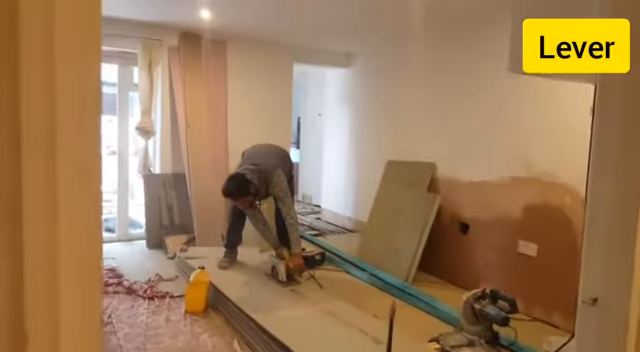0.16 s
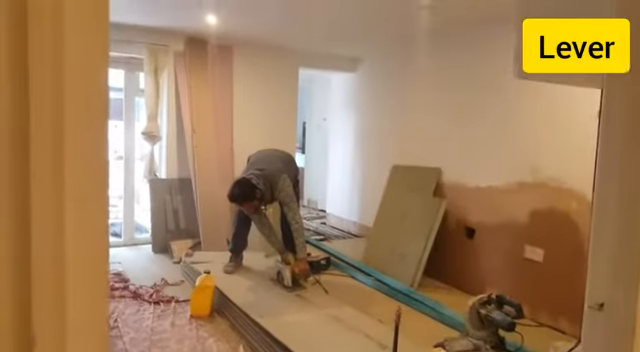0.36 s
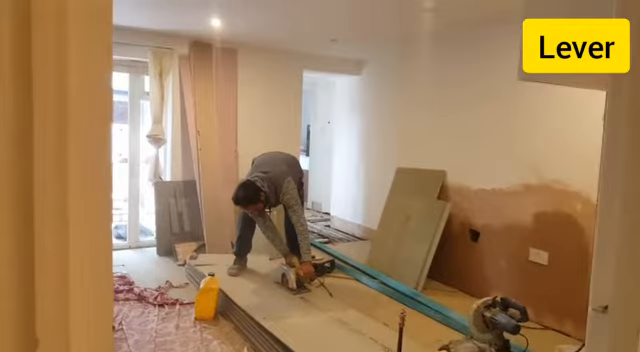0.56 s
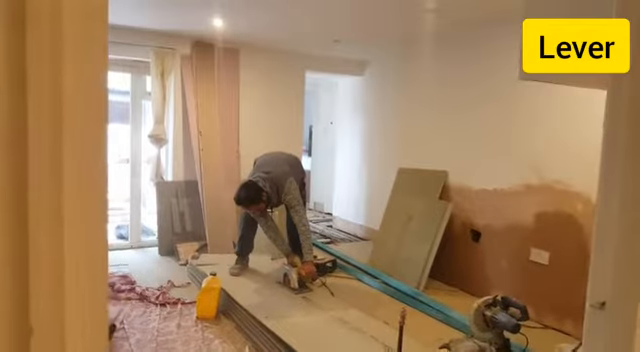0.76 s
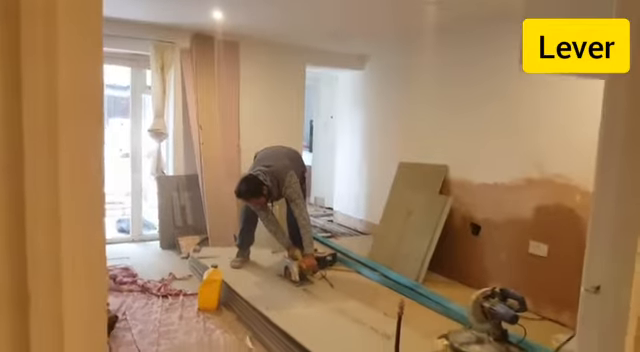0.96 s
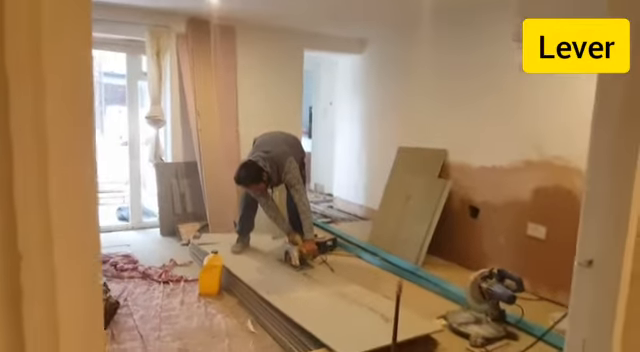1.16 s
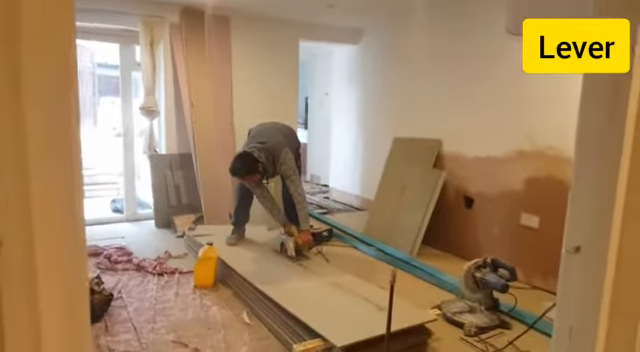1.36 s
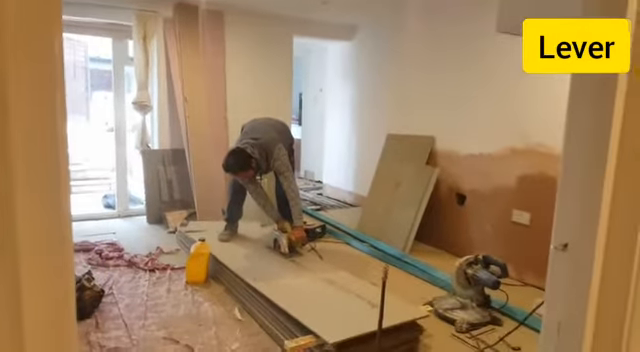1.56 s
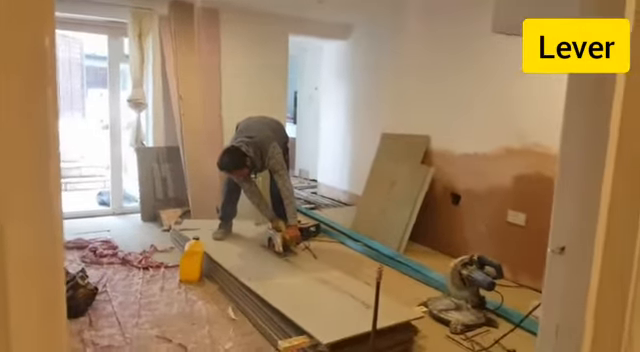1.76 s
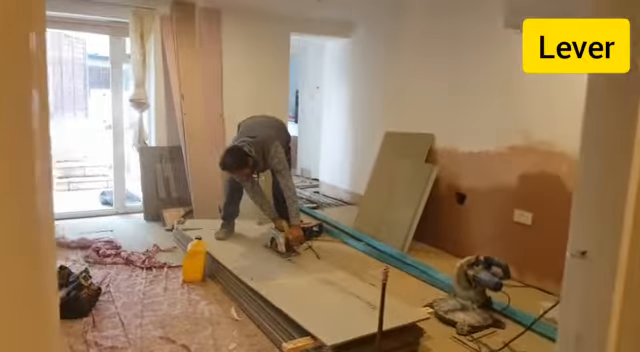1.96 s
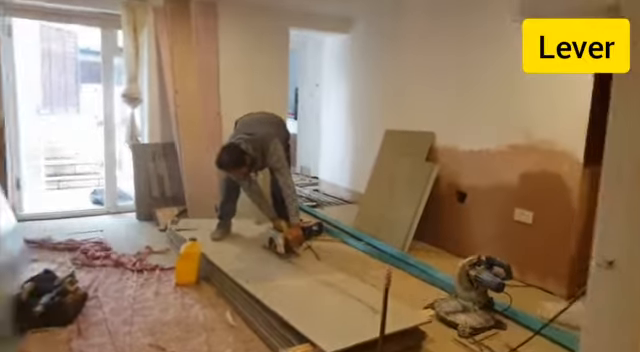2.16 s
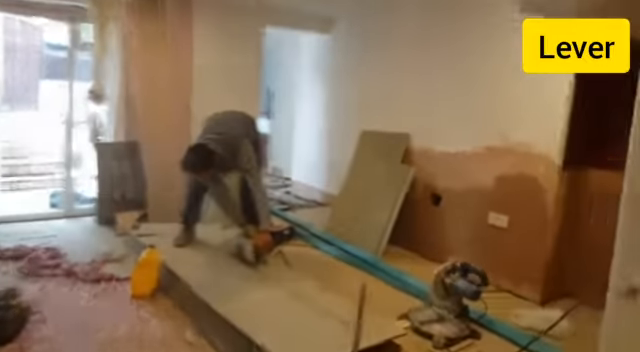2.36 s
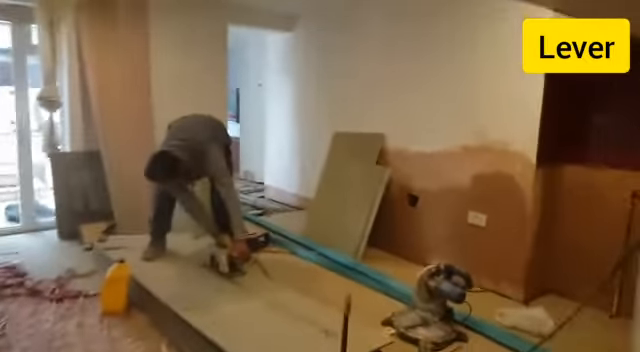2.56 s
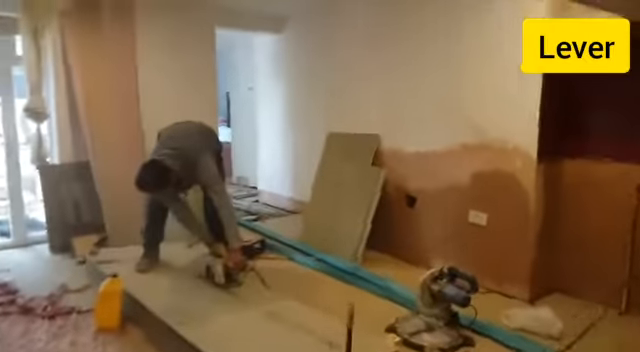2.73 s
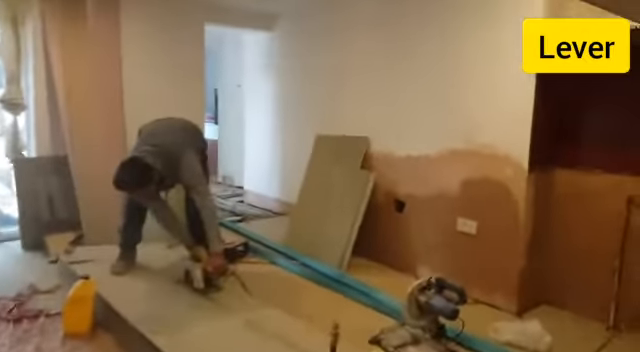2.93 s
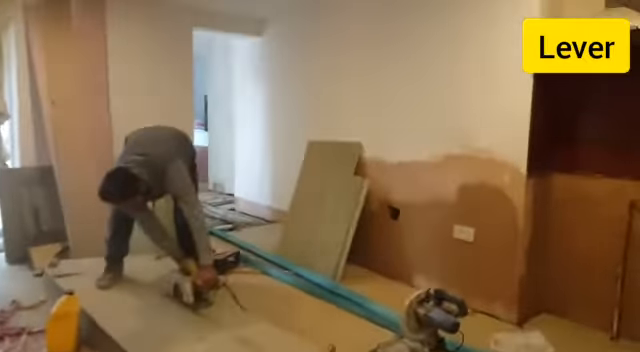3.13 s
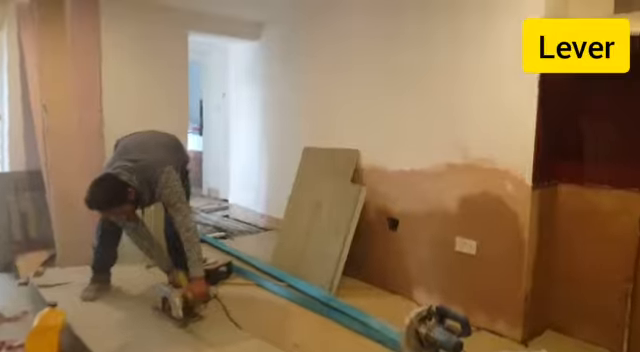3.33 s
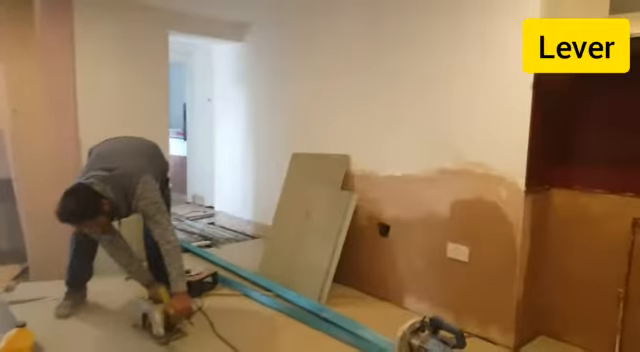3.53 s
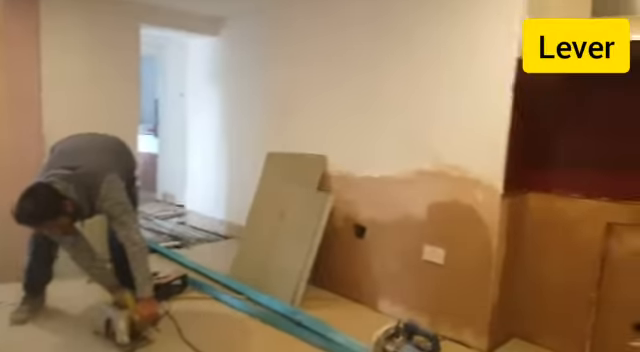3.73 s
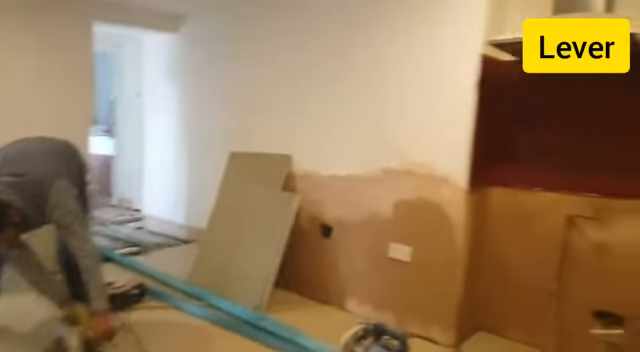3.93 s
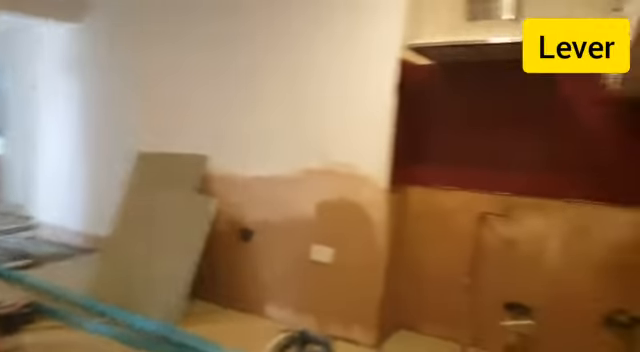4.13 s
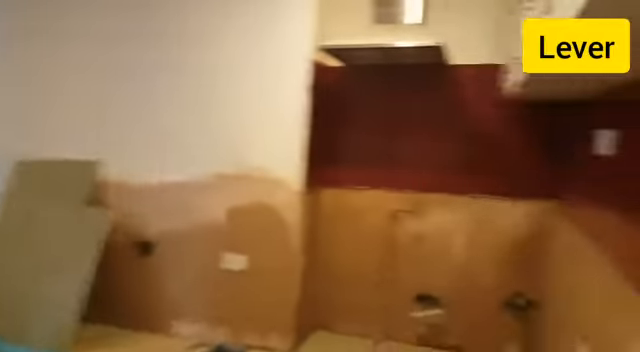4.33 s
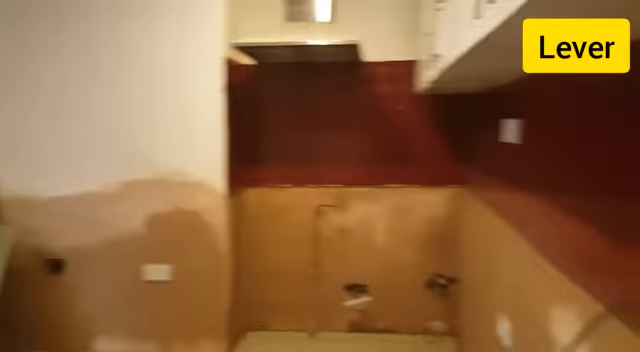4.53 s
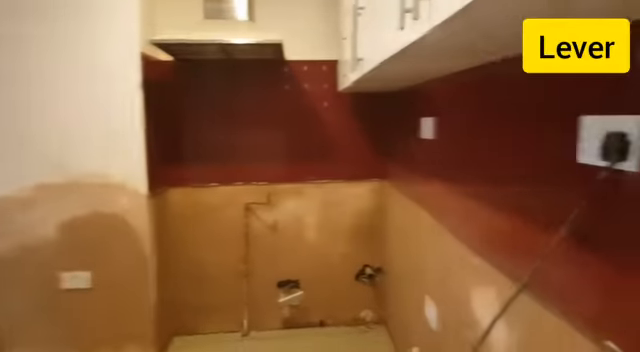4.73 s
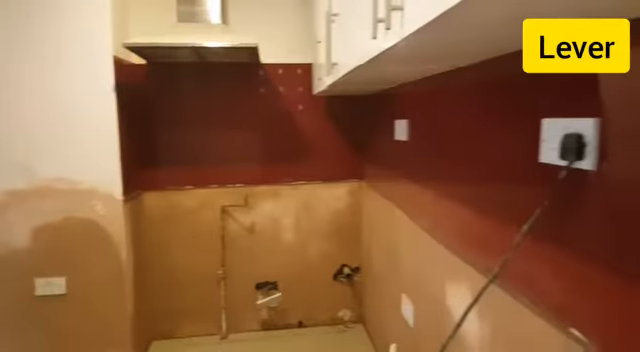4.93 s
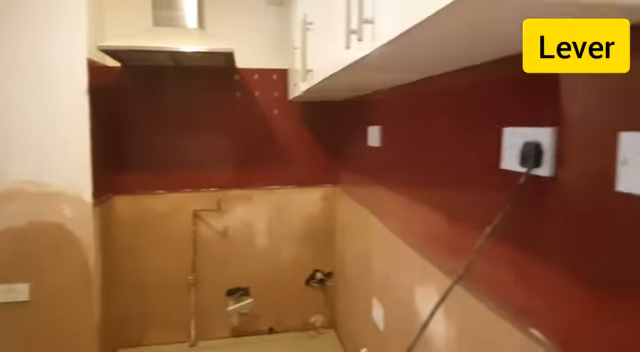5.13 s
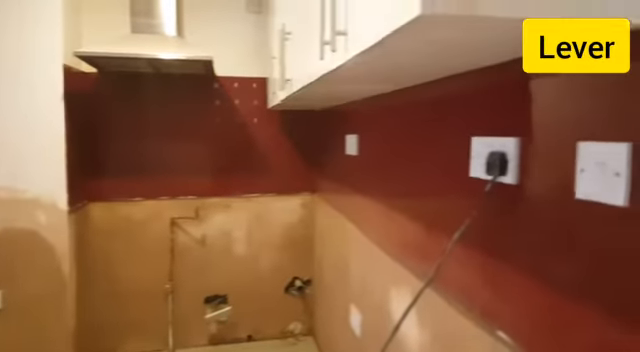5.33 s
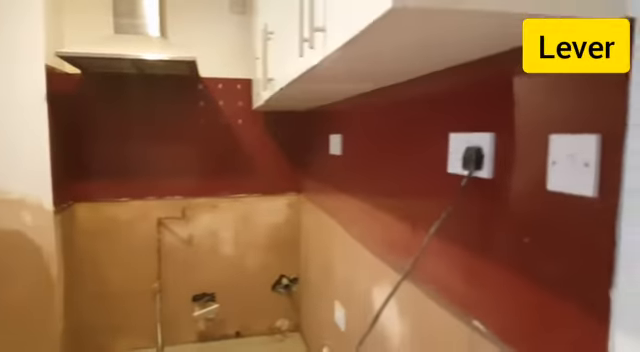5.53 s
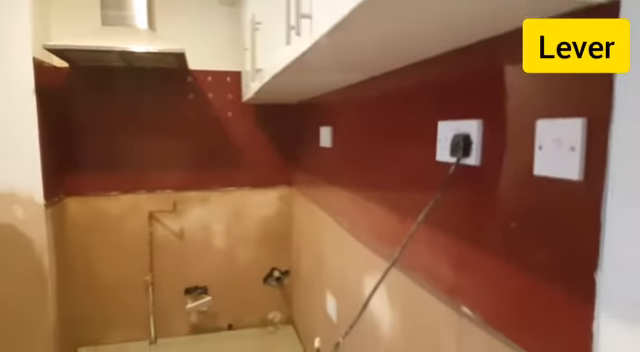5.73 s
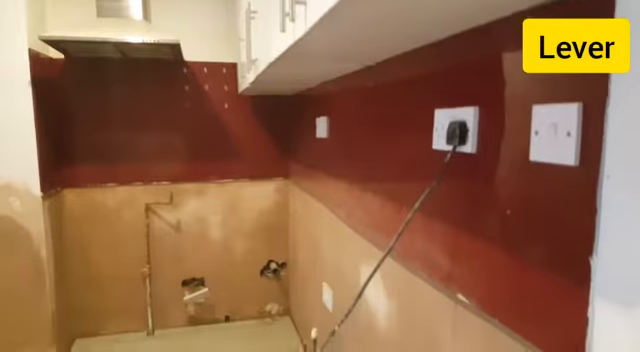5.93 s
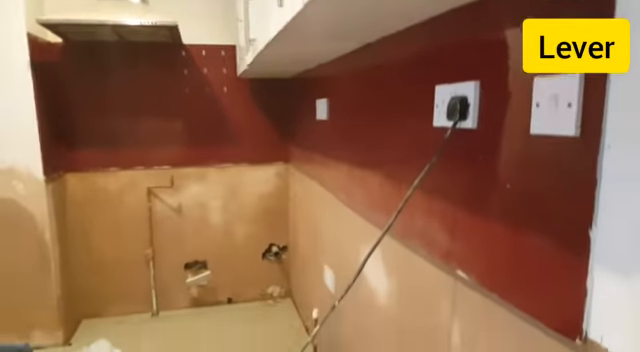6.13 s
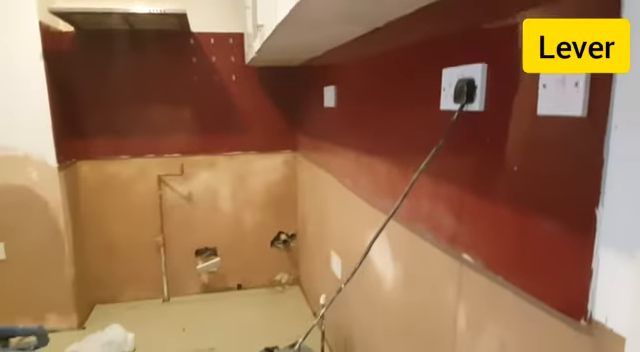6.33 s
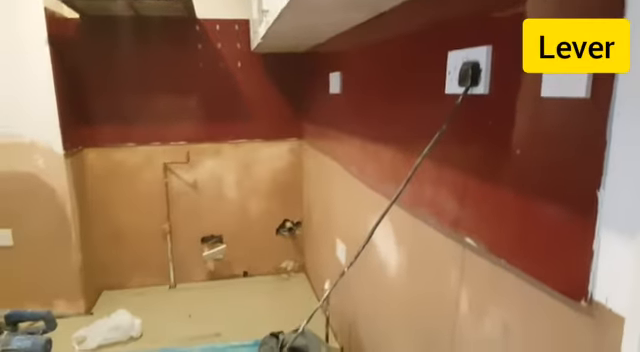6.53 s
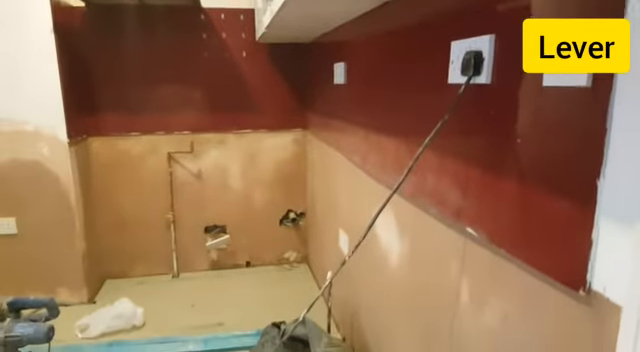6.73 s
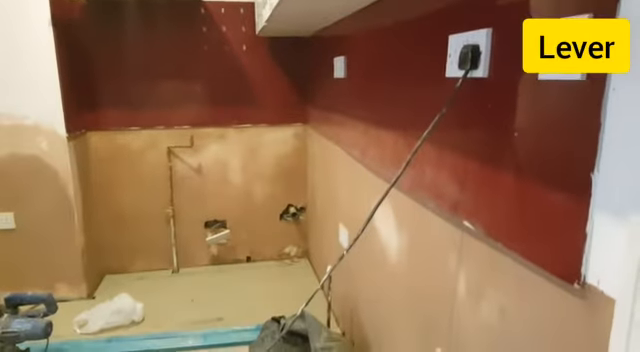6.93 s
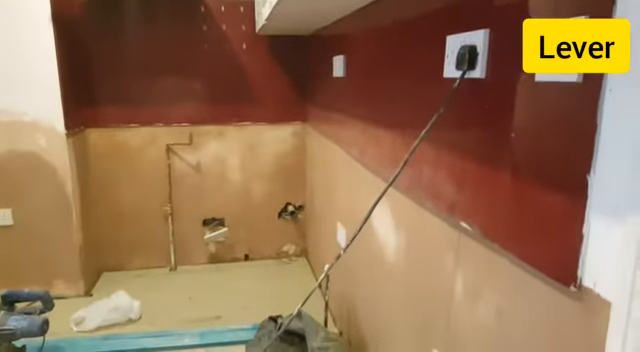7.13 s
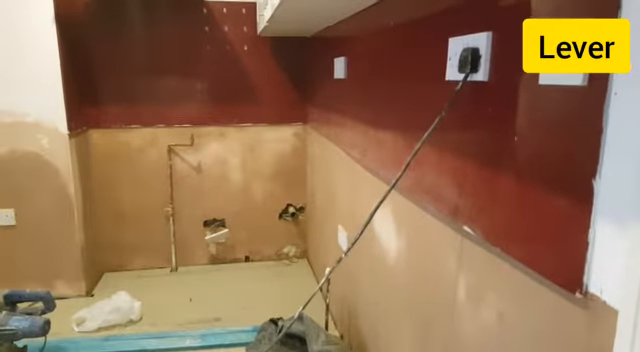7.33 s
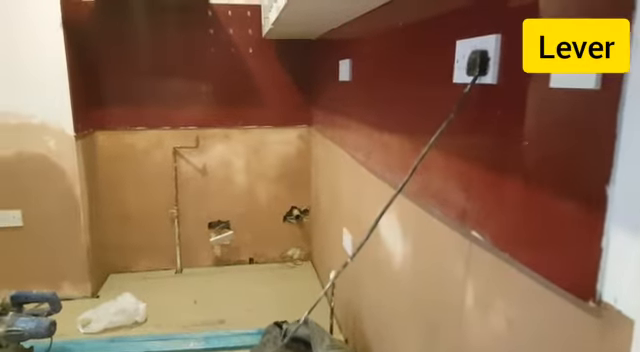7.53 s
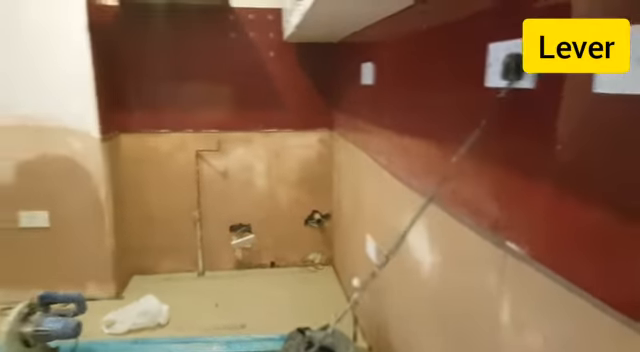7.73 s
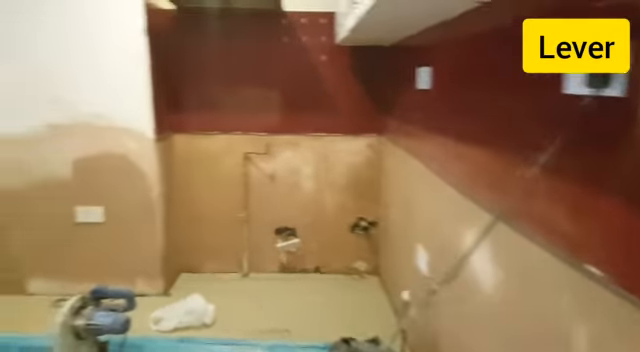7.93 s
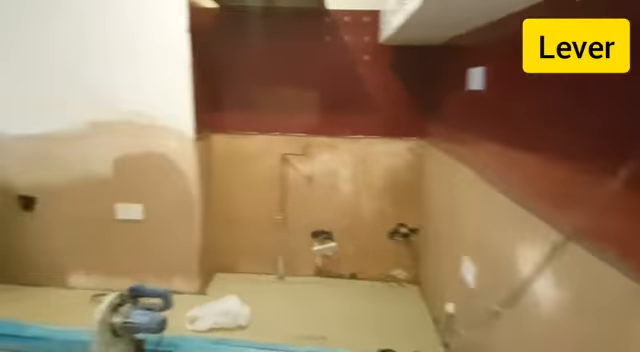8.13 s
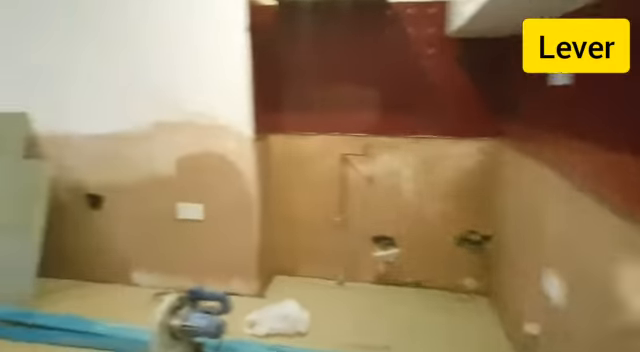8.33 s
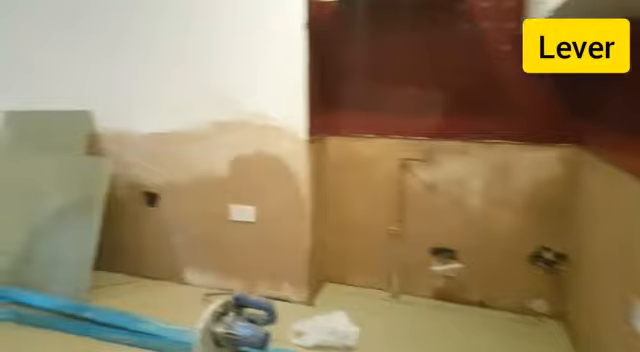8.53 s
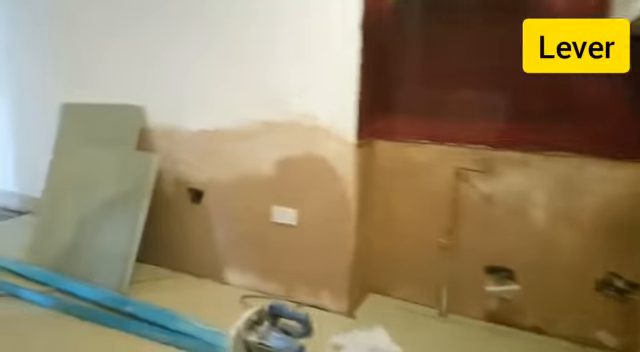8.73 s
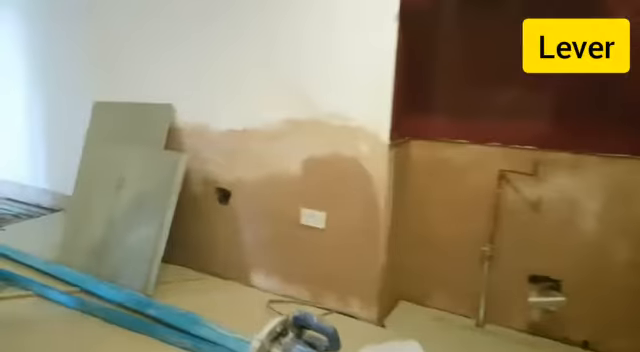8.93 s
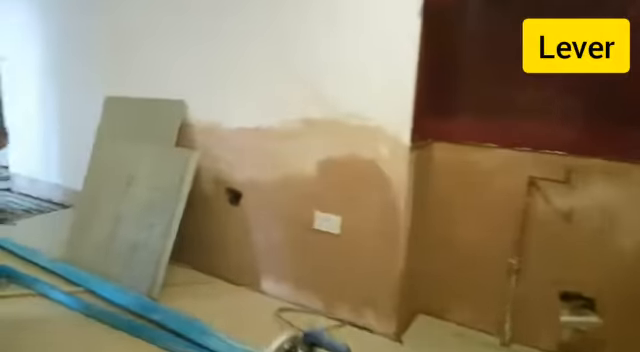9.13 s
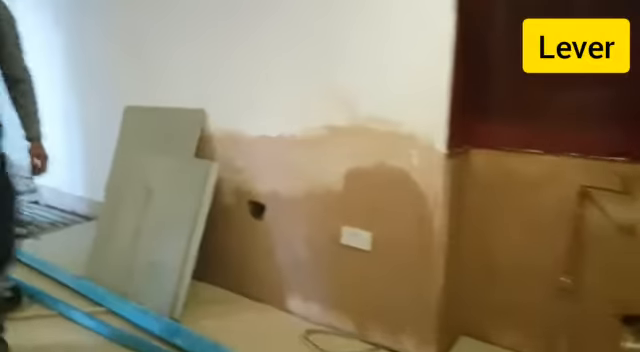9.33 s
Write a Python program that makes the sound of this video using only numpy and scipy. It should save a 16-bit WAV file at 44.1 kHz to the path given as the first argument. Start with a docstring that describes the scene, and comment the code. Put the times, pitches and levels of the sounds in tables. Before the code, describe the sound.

A circular saw grinds steadily through a floor board, bright and gritty, its blade squealing as the slot pinches it. The motor cuts out and the blade coasts for about three seconds, falling in pitch, ringing and swelling until it jerks still with a short metallic decay. After that, near quiet with faint low rumble, a tool clunk, a dull thud on loose boards and a gritty shoe scuff. Reverberant empty room, moving microphone.

```python
"""A hand-held circular saw rips a floor board in a bare plastered room, squealing when pinched, then coasts
to a stop with its blade ringing. Blade speed sets the pitches of whine, squeals and shaft tones; tooth and gear
impacts, partly repeating every turn, drive the blade's modes, each split into sidebands by the spin.
The microphone turns away from the saw; late come a clunk, a thud and some scuffing, shaped noise and board modes.
A low rumble of the house, coloured noise, lies under everything."""
import sys
import numpy as np
from scipy import signal
from scipy.fft import rfft, irfft, next_fast_len
from scipy.io import wavfile
from scipy.ndimage import map_coordinates

SR = 44100
rng = np.random.default_rng(int(sys.argv[2]) if len(sys.argv) > 2 else 0)


def store_wav(level_fs):
    """Save 16-bit WAV to argv[1]."""
    pcm = np.round(np.clip(np.atleast_2d(level_fs), -1, 1) * 32767)
    wavfile.write(sys.argv[1], SR, pcm.T.astype(np.int16))


N = 418066

RELEASE_S = 4.73  # the trigger is let go


def amp(db):
    """Decibels to gain."""
    return 10 ** (np.asarray(db) / 20)


def unit(x):
    """Scale to rms 1."""
    return x / np.sqrt(np.mean(x ** 2) + 1e-20)


def along(points, hz):
    """Read (Hz, value) points on a log frequency axis."""
    f, v = np.transpose(points)
    return np.interp(np.log(hz + 1), np.log(f + 1), v)


def curves(rows):
    """One value per sample for each column after the time."""
    s, *cols = np.transpose(rows)
    return [np.interp(np.arange(N) / SR, s, c) for c in cols]


def ramp(start_s, length_s):
    """Rises from 0 to 1 over the given time."""
    return np.clip((np.arange(N) / SR - start_s) / length_s, 0, 1)


def wobble(rate):
    """A smooth random curve, rate knots a second."""
    place = np.arange(N) * rate / SR
    coarse = np.arange(0, place[-1] + 1, 1 / 8)
    knots = rng.standard_normal(int(place[-1]) + 4)
    return np.interp(place, coarse, map_coordinates(knots, [coarse]))


def filtered(x, response):
    """Filter x by a response given as a function of frequency."""
    n = x.shape[-1]
    m = next_fast_len(n + 8192, real=True)
    return irfft(rfft(x, m) * response(np.fft.rfftfreq(m, 1 / SR)), m)[..., :n]


def coloured(x, spectrum):
    """Filter x by the given (Hz, dB) curve, at rms 1."""
    return unit(filtered(x, lambda hz: amp(along(spectrum, hz))))


def diffuse(size):
    """Stereo noise, alike in the bass and unrelated in the treble."""
    # Left-right likeness. Each row: frequency [Hz], correlation [-1 to 1].
    likeness = [(100, .72), (300, .75), (600, .5), (1200, .15), (3000, .05), (10000, 0)]

    def blend(hz):
        angle = np.arccos(np.clip(along(likeness, hz), -1, 1)) / 2
        return np.array([np.cos(angle), np.sin(angle)])

    mid, side = filtered(rng.standard_normal((2, size)), blend)
    return np.array([mid + side, mid - side])


def room(x, direct_db):
    """Direct sound plus the tail of bare walls, which keeps changing as saw and microphone move."""
    # Decay of the bare room. Each row: frequency [Hz], t60 [s].
    wall_decay = [(100, 0.33), (400, 0.72), (1500, 0.48), (4000, 0.44), (12000, 0.2)]
    hop = SR // 2
    earlier = np.pad(x, (hop, 2 * hop), mode="reflect")  # so the room already rings at the start
    fade = np.sin(np.pi * np.arange(2 * hop) / (2 * hop))
    wet = np.zeros((2, N + 6 * hop))
    for start in range(0, N + hop, hop):
        piece = fade * earlier[start:start + 2 * hop]
        if piece.any():
            hz, t, z = signal.stft(diffuse(hop), SR, nperseg=256)
            decay = amp(-60 * t / along(wall_decay, hz)[:, None])
            tail = signal.istft(z * decay, SR, nperseg=256)[1]
            answer = signal.fftconvolve(piece[None], tail, axes=1)
            wet[:, start:start + answer.shape[1]] += answer
    tail_sound = unit(wet[:, hop:hop + N]) * np.std(x)
    return (tail_sound + amp(direct_db) * x) / np.hypot(1, amp(direct_db))


def blade_speed():
    """Turns per second: held by the motor, run down by friction and air drag, and stopped by a last snag."""
    # Speed under power, sagging as the cut deepens. Each row: time [s], blade speed [turns per s].
    driven = [(0, 79.7), (.35, 80.3), (1.15, 80), (1.5, 80.65), (2.05, 80.6), (2.75, 79.35), (3.3, 78.8),
              (3.6, 79.25), (4.7, 79.6)]
    friction, drag = 14.1, .3  # turns per s lost per s; fraction lost per s
    coasted = np.maximum(np.arange(N) / SR - RELEASE_S, 0)
    speed = (curves(driven)[0] + friction / drag) * np.exp(-drag * coasted) - friction / drag
    snag_s, snag_length_s = 7.71, .14  # the teeth snag in the slot
    return np.maximum(speed * (1 - ramp(snag_s, snag_length_s)), 1e-3)


def slowing(speed, halving_db, knee=0):
    """Level change in dB below full speed: a steady slope per halving, steeper under the knee [turns per s]."""
    full_speed = 80  # turns per s
    return halving_db * np.log2(speed / full_speed) - 10 * np.log10(1 + (knee / speed) ** 2)


def binding():
    """The blade binds or runs freer in smooth swells; gives the dB added to ring and board."""
    # Each row: centre [s], half length to 1/e [s], added ring [dB], added board [dB].
    binds = [(0.054, 0.047, 2, 1.5), (2.53, 0.21, -3.5, 2), (3.4, 0.073, -1.5, -0.5), (3.621, 0.06, -1, -1),
             (3.84, 0.024, 1, 0.5), (4.116, .1, -3, 1), (4.372, 0.2, 1.5, 2.5), (4.92, 0.055, 2.5, -1),
             (5.193, 0.064, 1, -0.5), (6.841, 0.25, 1.5, 1), (7.452, 0.061, 0.5, 4), (7.65, 0.055, 5.5, 6)]
    t = np.arange(N) / SR
    return sum(np.outer(added_db, np.exp(-((t - s) / length) ** 2)) for s, length, *added_db in binds)


def impacts(turns, rough, regular, size=256):
    """Tooth and gear impacts: one pattern that returns every turn, plus chips that swell once a turn."""
    spectrum = np.exp(2j * np.pi * rng.random(size)) * (np.arange(size) > 0)
    pattern = irfft(spectrum, 32 * size)
    repeating = unit(np.interp(turns % 1, np.arange(len(pattern)) / len(pattern), pattern))
    chips = unit(rng.standard_normal(N) * np.exp(rough * np.cos(2 * np.pi * turns)))
    share = np.clip(regular * 0.076, 0, 1)  # power share of the repeating pattern
    return np.sqrt(share) * repeating + np.sqrt(1 - share) * chips


def blade(turns, ring_db, hiss_db, bright_db=4, softest_db=-12.0):
    """The steel disc rings; its nodal lines sweep past and split modes into a forward and a backward wave."""
    # Modes of the disc. Each row: frequency [Hz], width of one resonance pass [Hz], relative level [dB],
    # nodal diameters (rounded before use), forward over backward wave [dB].
    disc_modes = [(1786, 190, 0.5, 0, 0), (1785, 56, -7.5, 1, 0.5), (2031, 35, -7, 3, 0),
                  (2600, 50, -15.5, 3, 6), (2540, 86, -12, -0.5, 0), (3038, 43, -15.5, 2, 3.5),
                  (4060, 70, -16, 3, -2), (4695, 86, -7.5, 1, 3), (5308, 110, -7.5, 2, 2),
                  (5340, 65, -19.5, 7.5, 2.5), (6050, 47, -13, 2.5, 6.5), (6850, 79, -15, 3.5, 4)]
    m = next_fast_len(N)
    drive, f = rfft(impacts(turns, rough=0.36, regular=1.25), m), np.fft.rfftfreq(m, 1 / SR)
    hardness_db = np.maximum(hiss_db - ring_db, softest_db) + bright_db  # hard contact feeds the high modes
    out = np.zeros(N)
    for hz, width, db, diameters, forward_db in disc_modes:
        resonance = (2j * f * width / (hz * hz - f * f + 2j * f * width)) ** 2
        mode = np.fft.ifft(drive * resonance, m)[:N]  # one-sided spectrum: a complex wave
        spin = np.exp(2j * np.pi * round(diameters) * turns)
        waves = unit(np.real(mode * (amp(forward_db) * spin + spin.conj())))
        out += amp(db + hardness_db * np.log(hz / 1800) / 2) * waves
    return amp(ring_db) * out


def teeth(speed, turns):
    """The teeth pass the slot and whine; random flutter of phase and level roughens the tone."""
    # How strongly the saw radiates the tone, most at the blade's main mode. Each row: pitch [Hz], level [dB].
    whine = [(50, -67), (180, -50), (250, -46), (350, -38.5), (520, -35.5), (640, -45), (760, -41),
             (960, -43), (1220, -36), (1560, -30), (1730, -19.5), (1870, -31)]
    # Tooth tone and its neighbour from the blade's wobble. Each row: multiple of blade speed, level [dB].
    tooth_orders = [(24, 0), (26, -10)]
    flutter = np.interp(speed, [74, 79], [.65, .6])  # radians, a little more once the blade slows
    out = np.zeros(N)
    for order, db in tooth_orders:
        level = amp(2.5 * wobble(90) + 1.2 * wobble(9))
        tone = np.sin(2 * np.pi * order * turns + flutter * wobble(70)) * level
        out += amp(db + along(whine, order * speed)) * unit(tone)
    return out


def hum(turns, orders):
    """Shaft orders shaken by the bite of the teeth; standing waves make each swell and differ between sides."""
    shake_db, shake_jitter, shake_rate = 2, .25, 28  # dB, radians, knots per s
    out = np.zeros((2, N))
    for order, db in orders:
        phase = 2 * np.pi * (round(order) * turns + rng.random()) + shake_jitter * wobble(shake_rate)
        apart = np.minimum(.2 + order / 25, 1) * wobble(2)  # higher orders differ more between the sides
        sway_db = np.minimum(1.5 + order / 20, 3) * wobble(5) + shake_db * wobble(shake_rate)
        out += amp(db + sway_db) * np.sin([phase + apart, phase - apart])
    return out


def motor(turns, lingering=0.26):
    """The hum changes colour as the blade sinks into the board, and dies as the trigger is let go."""
    # Shaft hum early and deep in the cut. Each row: multiple of blade speed, relative level [dB].
    early_orders = [(2, -20.5), (4, -7.5), (8, 1.5), (9, -2.5), (12, -11), (15, -2.5), (23, 1), (24, -2.5),
                    (28, 4), (36, -3), (48, -9.5), (52, -7), (58, 5), (59, 5.5), (68, 2), (72, 1.5),
                    (78, -3), (84, -2), (87, -10), (90, -9)]
    deep_orders = [(2, -14.5), (3, -18), (4, -3), (5, -1), (9, -7), (11, -1), (12, -5), (21, 0), (22, 6),
                   (23, 7), (30, 0), (32, 3), (34, -2), (36, 2), (59, -1), (65, -1), (69, -1), (70, -1),
                   (79, -1), (88, -4)]
    deep_s, deepen_s, early_db, deep_db = 2.29, 0.27, -38.5, -39  # middle and length of the change
    release_s = 0.155  # length of the dying away
    deep = ramp(deep_s - deepen_s / 2, deepen_s)
    early = amp(early_db) * (1 - deep + lingering * deep) * hum(turns, early_orders)
    powered = 1 - ramp(RELEASE_S - release_s / 2, release_s)
    return powered * (early + amp(deep_db) * deep * hum(turns, deep_orders))


def shafts(speed, turns):
    """The blade's imbalance throbs once a turn; the faster armature is heard while coasting."""
    # The housing radiates the armature's tone in a narrow range of pitch. Each row: pitch [Hz], level [dB].
    housing = [(200, -76), (240, -43), (270, -45), (295, -46.5), (335, -42), (360, -44), (395, -43),
               (430, -77)]
    gear_ratio = 5.5  # armature turns per blade turn
    armature_level = amp(4 * wobble(18) + 2 * wobble(6))
    armature = unit(np.sin(2 * np.pi * gear_ratio * turns + 1.1 * wobble(55)) * armature_level)
    throb_db = -58 + slowing(speed, halving_db=51) + 1.5 * wobble(2.3)
    throb = amp(throb_db) * unit(np.sin(2 * np.pi * turns))
    return throb + amp(along(housing, gear_ratio * speed)) * armature


def house():
    """The low rumble of the house, coloured noise that is a little louder once the saw stands."""
    # Colour of the rumble. Each row: frequency [Hz], relative density [dB per Hz].
    rumble = [(20, -15), (55, -3), (100, -7), (170, -9), (350, -16), (800, -19.5), (2000, -22),
              (4000, -32.5), (8000, -41.5), (15000, -44.5)]
    background_db, settled_db, settled_s = -63, -58.5, 7.8
    level_db = background_db + (settled_db - background_db) * ramp(settled_s, .2)
    return amp(level_db) * coloured(diffuse(N), rumble)


def sides(phase):
    """A tone reaches the two sides about a quarter cycle apart, drifting as the microphone moves."""
    apart = np.pi / 4 + .25 * wobble(3)
    return np.sqrt(2) * np.sin([phase + apart, phase - apart])


def squeals(turns):
    """Pinched in the slot, the blade locks briefly onto one multiple of its speed and screams."""
    # Each row: centre [s], half length to 1/e [s], multiple of blade speed, level [dB].
    pinches = [(.05, .08, 24, -20), (.5, .2, 28, -24), (.52, .2, 24, -24.5), (.7, .25, 68, -35),
               (1.35, .12, 72, -34), (1.5, .12, 23, -25), (1.53, .14, 28, -22.5), (1.55, .2, 24, -28),
               (1.75, .2, 59, -28), (1.88, .22, 72, -35), (1.9, .15, 23, -26), (2.1, .14, 28, -28),
               (2.45, .16, 22, -23), (2.6, .2, 24, -21.5), (3.08, .15, 70, -28), (3.15, .25, 22, -26),
               (3.42, .1, 24, -17), (3.45, .1, 36, -31), (3.77, .1, 32, -26), (3.79, .05, 27, -26),
               (4.11, .06, 88, -31), (4.13, .06, 24, -15), (4.13, .06, 36, -25), (4.15, .13, 26, -20.5),
               (4.26, .08, 32, -30), (4.36, .06, 36, -31), (4.37, .11, 24, -16.5), (4.48, .1, 40, -33)]
    chatter_db, chatter_rate, jitter = 1.5, 35, 0.23  # dB, knots per s, radians
    t, out = np.arange(N) / SR, np.zeros((2, N))
    for order in sorted({round(row[2]) for row in pinches}):
        swell = sum(amp(db) * np.exp(-((t - s) / length) ** 2)
                    for s, length, k, db in pinches if round(k) == order)
        chatter = amp(chatter_db * wobble(chatter_rate))
        out += swell * chatter * sides(2 * np.pi * order * turns + jitter * wobble(chatter_rate))
    return out


def growl(turns):
    """Growling resonances driven by the impacts: mostly board shudders, and a short narrow motor tone."""
    # The loosened strip of board shudders late in the cut and as the last teeth drag over it;
    # the narrow row near 830 Hz at 4.7 s is the motor tone. Each row: centre [s], half length to 1/e [s],
    # resonance [Hz], base width before broadening [Hz], level [dB].
    resonances = [(4.2, .55, 860, 150, -37), (4.7, .13, 830, 25, -37), (5.9, .8, 360, 110, -45),
                  (7.2, .35, 1200, 350, -38.5), (7.62, .05, 1150, 400, -33), (7.7, .04, 170, 50, -46),
                  (7.73, .06, 1350, 650, -37), (7.75, .07, 385, 120, -45.5)]
    drive = impacts(turns, rough=.8, regular=2)
    t, out = np.arange(N) / SR, np.zeros(N)
    for s, length, hz, width, db in resonances:
        broad = 1.5 * width
        body = filtered(drive, lambda f: (1j * f * broad / (hz * hz - f * f + 1j * f * broad)) ** 2)
        out += amp(db) * np.exp(-((t - s) / length) ** 2) * unit(body)
    return out


def ring_out(stop_s=7.75, ring_db=-35, swell_db_per_s=14):
    """Lightly damped blade modes swell as pure tones until the spin dies, then decay freely."""
    # Modes that sing on. Each row: frequency [Hz], relative level [dB], t60 [s].
    singing = [(1195, -10, .4), (1400, -11, .55), (1561, -7, .5), (1729, -7, .55), (1771, -4, .6),
               (2035, -2, .6), (2600, -5, .5), (3009, -11, .55), (4059, -21, .48), (4597, -20, .47),
               (4690, -19, .45), (5152, -22, .42), (5340, -17, .43), (5997, -22, .4)]
    t = np.arange(N) / SR
    swell_db = ring_db + np.minimum(t - stop_s, 0) * swell_db_per_s
    after = np.maximum(t - stop_s, 0)
    driven = np.exp(-after / .04)
    out = np.zeros((2, N))
    for hz, db, t60 in singing:
        # the last impacts jostle level and phase; the free ring only wavers
        jostle_db = driven * (3 * wobble(20) - 3)
        jostle = np.cumsum((1 + driven) * wobble(40)) * hz / 60 / SR
        level = amp(swell_db + db + jostle_db - 60 * after / t60)
        out += level * sides(2 * np.pi * hz * t + jostle)
    return out


def saw():
    """Blade speed sets the pitches and fades ring, board and hiss; walls, tones and squeals are summed."""
    # Effort of the cut, then of the blade rubbing in the slot, before binds and slowing.
    # Each row: time [s], blade ring [dB], board and motor noise [dB], dust and fan hiss [dB].
    effort = [(0, -24, -24.5, -23), (1.1, -23.5, -25, -24), (1.5, -22.5, -22.5, -23),
              (2.7, -21, -27, -24.5), (3.2, -21.5, -22.5, -23), (4.1, -19, -24, -21),
              (4.7, -21, -21.5, -21.5), (5.05, -18.5, -25, -25.5), (6.4, -18, -23.5, -21),
              (7.5, -19.5, -25.5, -20.5)]
    # Colours of board noise and hiss. Each row: frequency [Hz], relative density [dB per Hz].
    board_colour = [(30, -35), (70, -28), (120, -16), (200, -13), (300, -6), (390, -4.5), (480, -2),
                    (650, 0), (850, 2), (1100, 0), (1400, 1), (2000, 8), (3000, -1.5), (4000, -7),
                    (6000, -47.5)]
    hiss_colour = [(2500, -31), (3500, 3.5), (5000, 14), (7000, 4.5), (8000, 1.5), (9300, -3),
                   (10050, -5.5), (10800, -0.5), (12800, 2.5), (15700, -1.5)]
    speed = blade_speed()
    turns = np.cumsum(speed * (1 + 0.000838 * wobble(25))) / SR
    ring_db, board_db, hiss_db = curves(effort)
    bind_ring_db, bind_board_db = binding()
    # contact of the blade is less steady once it runs free
    flutter_db = np.where(np.arange(N) / SR < RELEASE_S, .5, 1.3) * wobble(14)
    ring_db = ring_db + bind_ring_db + slowing(speed, halving_db=0.46, knee=15) + flutter_db
    board_db = board_db + bind_board_db + slowing(speed, halving_db=1.5, knee=6)
    hiss_db = hiss_db + slowing(speed, halving_db=3.4, knee=20)
    scraping = amp(board_db) * coloured(impacts(turns, rough=.3, regular=.25), board_colour)
    spraying = amp(hiss_db) * coloured(impacts(turns, rough=.4, regular=.9), hiss_colour)
    noise = scraping + spraying + blade(turns, ring_db, hiss_db)
    walls = room(noise + growl(turns), direct_db=-16)
    whining = room(teeth(speed, turns), direct_db=-2.5)
    running = walls + whining + motor(turns) + shafts(speed, turns)
    lead_s = .00018  # the saw reaches the left side this much earlier
    left_first = filtered(running, lambda hz: np.exp(1j * np.pi * hz * lead_s * np.array([[1], [-1]])))
    return left_first + squeals(turns) + ring_out()


def turning(pair):
    """The saw stands to the left, so the right is shaded; a hollow sweeps the left treble during the turn."""
    # Resting balance. Each row: frequency [Hz], left minus right [dB].
    shade = [(60, -2), (110, -4), (200, 0.5), (380, -1), (700, 1), (1290, 1.5), (2380, 5.5), (4400, 13.5),
             (8120, 24), (15000, 18)]
    # The microphone's turn shifts the saw. Each row: time [s], left minus right before the share below [dB].
    swing = [(0, 2), (1.5, 3), (2.75, 3.5), (3.43, 0), (3.6, -11), (4.2, -9.5), (4.65, -13), (4.85, -2.5),
             (7.8, 0)]
    # How much of that swing acts at each pitch. Each row: frequency [Hz], share [0-1].
    reach = [(400, .15), (1000, 0.6), (1800, 0.21), (3000, 0.71), (5000, 0.1), (8000, 0.088)]
    # Upper edge of the hollow. Each row: time [s], edge [Hz].
    hollow_edge = [(3.54, 2500), (3.61, 6450), (3.83, 4400), (3.9, 5600), (4.07, 5100), (4.25, 9800),
                   (4.39, 7200), (4.48, 8360), (4.67, 5540), (4.72, 2530)]
    # frequency in Hz, gain in dB inside the hollow
    hollow_depth = [(2800, 1), (3600, -4.0), (5400, -14.5), (6200, -19), (8000, -12.5), (9500, -13)]
    hz, t, z = signal.stft(pair, SR, nperseg=512)
    swing_db = np.interp(t, *np.transpose(swing))
    ratio = amp(along(shade, hz)[:, None] + along(reach, hz)[:, None] * swing_db)
    edge_hz = np.interp(t, *np.transpose(hollow_edge))
    inside = np.clip((edge_hz - hz[:, None]) / 450, 0, 1)
    hollow_db = inside * along(hollow_depth, hz)[:, None]
    gains = np.array([ratio * amp(hollow_db), np.ones_like(ratio)]) * 2 / (1 + ratio)
    return signal.istft(z * gains, SR, nperseg=512)[1][:, :N]


def knocks():
    """Tool and boots land on loose boards: a short crunch, and the modes near the blow's pitch ring."""
    # Each row: start [s], crunch [dB], brightness corner [Hz], crunch t60 [s], ring [dB], pitch of the blow [Hz].
    blows = [(8.379, -41.5, 1400, 0.15, -38, 330), (8.398, -42, 2000, 0.089, -40, 620),
             (8.411, -43.5, 2600, 0.24, -44, 330), (8.545, -53, 1790, .15, -48, 370),
             (8.659, -53, 900, .12, -60, 250), (8.991, -50.5, 2227, 0.12, -60, 700),
             (9.226, -35, 1000, 0.13, -35, 247), (9.249, -36, 260, 0.11, -36, 149),
             (9.295, -39, 220, .1, -43, 160)]
    # Modes of the loose boards. Each row: frequency [Hz], relative level [dB], t60 [s].
    board_modes = [(92, 2, .18), (125, -7, .18), (177.4, 4.5, 0.16), (245, 2, 0.16), (322, -6, .15),
                   (370, 0, 0.13), (540, -4, .12), (680, 1, 0.14), (830, -5, .12), (1000, -12, .14),
                   (1217, -5, .14)]
    # The boards' response to a blow. Each row: frequency [Hz], relative density [dB per Hz].
    floorboards = [(50, -22), (100, -3), (170, 0), (290, 3), (480, -6), (780, -1), (1300, -6), (1800, -4.5),
                   (3000, -1.5), (6000, 1), (10000, -18)]
    crunch, ring, t = np.zeros(N + SR), np.zeros(N + SR), np.arange(SR // 2) / SR
    attack = 1 - np.exp(-t / 0.0011)
    for s, db, corner_hz, t60, ring_db, pitch_hz in blows:
        span = slice(round(s * SR), round(s * SR) + len(t))
        body = filtered(rng.standard_normal(len(t)),
                        lambda hz: amp(along(floorboards, hz)) / np.hypot(1, (hz / corner_hz) ** 3))
        crunch[span] += amp(db - 60 * t / t60) * attack * unit(body)
        for hz, mode_db, mode_t60 in board_modes:
            nearness = 1 / (1 + (2 * np.log2(hz / pitch_hz)) ** 2)
            decay = amp(ring_db + mode_db - 60 * t / mode_t60)
            ring[span] += decay * nearness * attack * np.sin(2 * np.pi * hz * t)
    return room(crunch[:N] + ring[:N], direct_db=0)


def scuffs():
    """Soles drag over the gritty floor: unsteady coloured noise under the pressure of each drag."""
    # Drags of a sole. Each row: start [s], time until the release begins [s], level [dB].
    drags = [(8.46, 0.28, -68), (8.85, 0.13, -59), (9.244, 0.11, -57), (9.34, 0.24, -50.5)]
    # Colour of the drag. Each row: frequency [Hz], relative density [dB per Hz].
    sole = [(100, -29.5), (300, -2), (600, -6), (1500, -5), (2500, -8), (5000, -19.5), (8000, -29),
            (13000, -41)]
    attack_s, release_s = 0.023, 0.0396
    grit = rng.standard_normal(N) * amp(3 * wobble(180))
    pressure = sum(amp(db) * ramp(s, attack_s) * (1 - ramp(s + length, release_s))
                   for s, length, db in drags)
    return room(pressure * coloured(grit, sole), direct_db=-12.0)


def scene():
    """Saw, handling sounds and the low rumble of the house."""
    return turning(saw()) + house() + knocks() + scuffs()


def record(dry):
    """The highest peaks are rounded off, and the top of the treble is cut by a steep band limit."""
    top_hz = 15850  # middle of a 200 Hz wide slope
    rounded = dry / (1 + np.abs(dry / .93) ** 8) ** (1 / 8)
    return filtered(rounded, lambda hz: np.clip((top_hz - hz) / 200 + .5, 0, 1))


dry = scene()
out = record(dry)
store_wav(out)
```